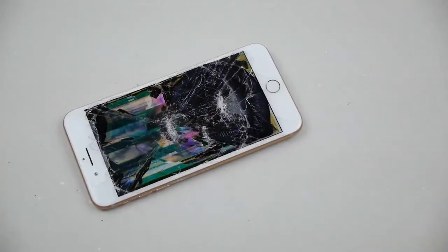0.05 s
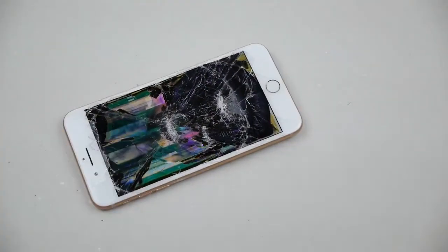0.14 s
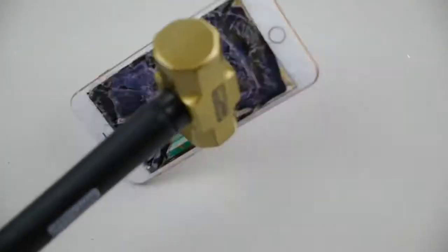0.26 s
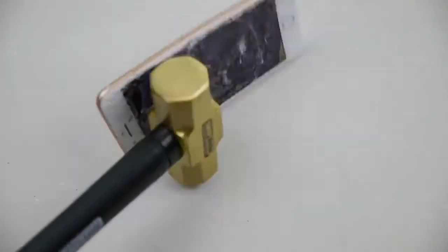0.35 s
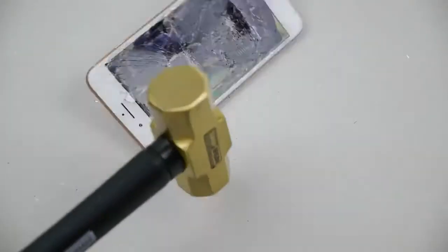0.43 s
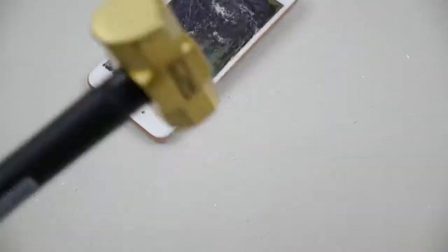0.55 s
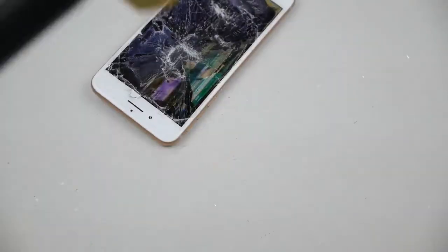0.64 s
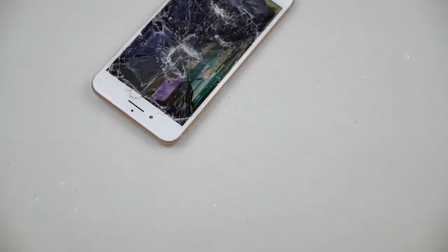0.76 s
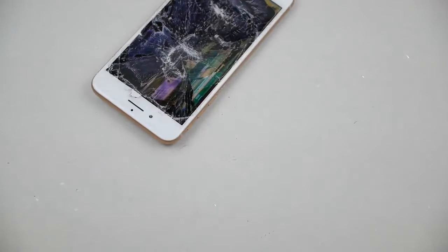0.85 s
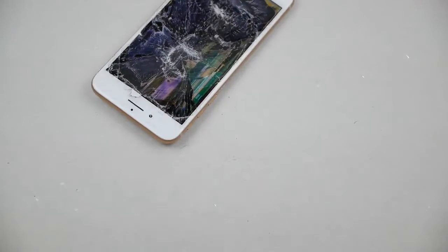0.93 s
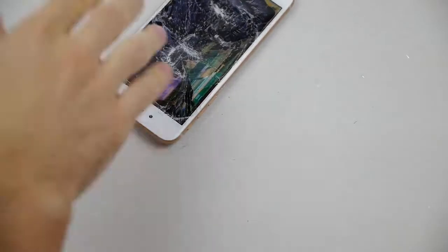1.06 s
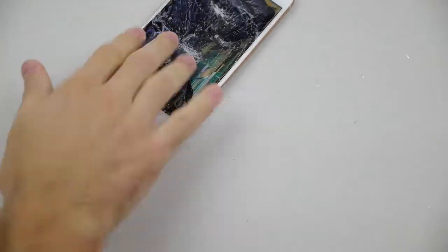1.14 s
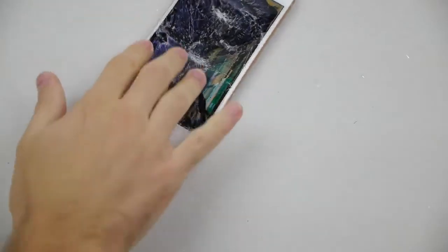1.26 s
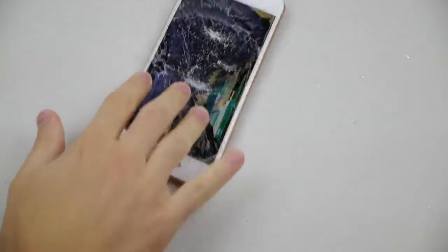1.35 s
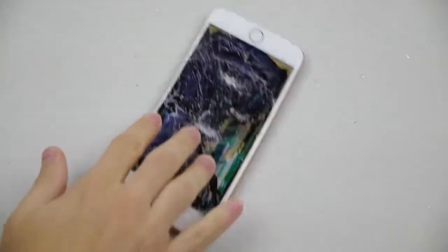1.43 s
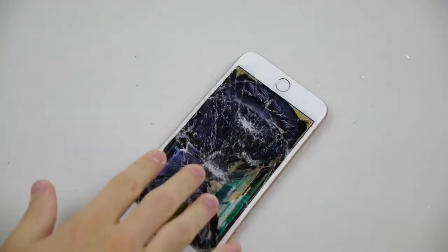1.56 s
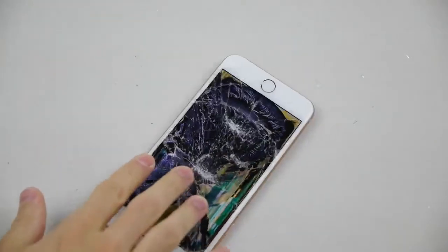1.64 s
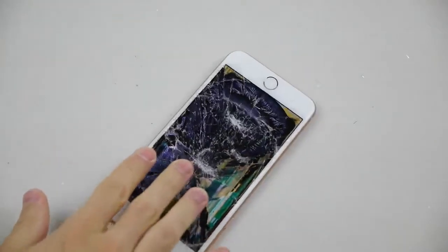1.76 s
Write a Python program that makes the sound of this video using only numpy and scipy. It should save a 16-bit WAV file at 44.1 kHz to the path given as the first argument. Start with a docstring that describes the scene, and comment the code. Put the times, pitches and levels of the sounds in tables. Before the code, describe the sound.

One hard hammer blow on a broken phone screen, a clattering bounce, then gritty glass scraping

```python
"""Quiet room noise, then a hammer hits a cracked phone on a table; it hops, clatters and settles as the room rings.
A hand lands on it and drags it back over glass splinters, which crunch and hiss under the case.
Strikes are clicks plus decaying grit; the drag is shaped grit; table top and shards are decaying sines.
The blow overloads the microphone and pushes down its gain control, whose recovery holds up the echo."""
import sys
import numpy as np
from scipy import signal
from scipy.io import wavfile
from scipy.ndimage import uniform_filter1d

SR = 44100
rng = np.random.default_rng(int(sys.argv[2]) if len(sys.argv) > 2 else 0)


def inscribe(sig):
    """Save sig as 16-bit PCM at rate SR to the path in sys.argv[1].

    A 1-D sig is mono; a 2-D sig holds one channel per row.
    Samples are clipped to [-1, 1] before scaling.
    """
    pcm = np.round(np.clip(np.atleast_2d(sig).T, -1, 1) * 32767)
    wavfile.write(sys.argv[1], SR, pcm.astype(np.int16))


N = 79380
TIME_S = np.arange(N) / SR
RESPONSE_SAMPLES = 8000
EDGES_HZ = 35 * 2 ** np.arange(0, 9.1, .5)  # half octaves
BANDS_HZ = np.sqrt(EDGES_HZ[1:] * EDGES_HZ[:-1])

# background noise: (frequency [Hz], level per band [dB])
FLOOR = [(30, -69), (50, -65), (78, -56.5), (125, -69.5), (250, -69.5), (520, -68), (1000, -69.5),
         (3000, -70.5), (8000, -68.5), (15000, -71.5)]
# stereo likeness: (frequency [Hz], left-right correlation [0..1])
LIKENESS = [(60, 1), (250, .99), (600, 0.94), (1300, 0.77), (2600, 0.32), (5000, 0.51), (14000, 0.06)]
# room decay: (frequency [Hz], t60 [s])
ROOM_T60 = [(60, 0.37), (150, .56), (500, 0.47), (2000, 0.49), (5000, 0.54), (9000, 0.22), (15000, .42)]
# sound sent into the room: (frequency [Hz], relative level [dB])
ROOM_SEND = [(60, -1.5), (150, -3), (400, -10.5), (1200, -4), (4000, -9.5), (9000, -11.5), (15000, -16.5)]

# centres of a strike's bass, thud, knock and crack: (frequency [Hz])
IMPACT_HZ = [120, 450, 2000, 9000]
# the blow, the phone's bounces, single shards snapping under the case:
# (time [s], crumble time constant [s], bass [dB], thud [dB], knock [dB], crack [dB])
IMPACTS = [(0.2488, .002, 9.5, 15.5, 11.5, 2.5), (0.2528, 0.0014, 16.5, 21, 13, 12),
           (0.2559, 0.00067, -8, 21.5, 17, -7), (.2615, 0.0058, -33, 8, 8.5, 4),
           (0.3989, 0.0013, 1, 4, 5.5, -4), (.5160, 0.0028, -22, -30, -14, -15.5),
           (0.5224, 0.011, -12, -15.5, -7.5, -28), (.5810, 0.0029, -42, -17, -22, -47),
           (0.6194, 0.0036, -15.5, -19.5, -21.5, -26.5), (0.6297, 0.00067, -20, -8, -15, -24),
           (0.6586, 0.0067, -30, -22, -17, -45), (0.6838, 0.0036, -20.5, -40, -58, -34.5),
           (0.7068, .004, -32, -39, -52, -32), (0.7373, 0.0019, -43, -44, -40, -38.5),
           (0.747, 0.0063, -30.5, -62, -36, -35), (0.7619, 0.0091, -52, -63, -39, -34.5),
           (.8070, 0.013, -32, -42, -37.5, -37.5), (.8880, 0.0041, -41.5, -53, -61.5, -49.5),
           (1.069, 0.0037, -63, -85, -53, -57), (1.2105, 0.00052, -55.5, -50.5, -34.5, -25.5),
           (1.2767, 0.00043, -72, -50.5, -25, -27), (1.5088, 0.00038, -56, -43, -27, -17)]
# strike spectrum: (frequency [Hz], relative level [dB])
IMPACT_COLOUR = [(35, -32), (70, -20.5), (115, -7), (220, -9), (330, -4.5), (500, 1), (800, -8.5),
                 (1500, -9), (3500, -5.5), (8000, -5), (15000, -10.5)]
# strike ring: (frequency [Hz], t60 [s])
IMPACT_RING = [(60, 0.028), (130, .07), (450, 0.11), (1500, 0.0073), (5000, 0.06), (15000, .016)]
# part of a strike that crumbles glass: (frequency [Hz], share of energy [0..1])
CRUMBLING = [(300, 0.015), (1000, 0.38), (2500, 0.68), (8000, 1)]
# table-top resonances: (frequency [Hz], relative level [dB], t60 [s])
TABLE_MODES = [(116.5, 6.5, 0.22), (147.4, -6.5, 0.37), (167, -10, 0.27), (204.4, -15.5, 0.4),
               (274.7, -12.5, 0.42), (357.6, -4.5, 0.2), (393, -18.5, 0.61), (523, -18.5, 0.38),
               (567, -18.5, 0.33), (928, -25, 0.64)]

# sliding, as the phone skids to rest and is dragged: (time [s], level [dB], treble tilt [dB/octave])
DRAG = [(.90, -71, 4), (.935, -55.5, 3.5), (.96, -67, 2.5), (1.0, -92, 1), (1.185, -85, -4),
        (1.204, -43.5, 2), (1.255, -51, 2), (1.29, -41, 4), (1.325, -40, 6), (1.39, -36, 0.5),
        (1.425, -39.5, 1), (1.521, -32.5, 1.5), (1.555, -41.5, 3), (1.606, -55, 7), (1.671, -41.5, 2),
        (1.721, -48.5, 7), (1.744, -62.5, 5.5), (1.765, -47.5, 4.5), (1.8, -54, 11.5)]
# sliding spectrum: (frequency [Hz], relative level [dB])
DRAG_COLOUR = [(40, -47.5), (75, -30), (120, -1), (200, -15.5), (290, -8), (400, -2.5), (1000, -13.5),
               (1800, -13.5), (3000, 0.5), (6000, -3.5), (11000, -2), (15000, -4)]
TILT_PIVOT_HZ, TILT_LOWEST_HZ = 4270, 900
# centres of a crunch's body, crunch and hiss: (frequency [Hz])
CRUNCH_HZ = [540, 3630, 11100]
# splinters giving way under the case: (time [s], length [s], body [dB], crunch [dB], hiss [dB])
CRUNCHES = [(1.211, 0.0018, -62, -30, -35), (1.2611, 0.0035, -53, -32.5, -32),
            (1.269, 0.006, -34, -23.5, -23.5), (1.276, 0.0081, -45, -30.5, -29),
            (1.338, 0.01, -32.5, -29, -34), (1.362, 0.0066, -33, -17.5, -18.5),
            (1.399, .008, -44, -29.5, -19.5), (1.439, 0.0025, -47, -36, -26),
            (1.452, 0.0029, -36, -23, -15.5), (1.464, 0.0011, -22.5, -70, -56),
            (1.482, 0.012, -41.5, -31, -31), (1.499, 0.01, -53, -28.5, -26.5),
            (1.508, 0.011, -42.5, -33, -44), (1.578, 0.0074, -36, -42, -34.5),
            (1.62, 0.0064, -51.5, -48.5, -30.5), (1.634, 0.0034, -48, -58, -24),
            (1.658, 0.0044, -48.5, -45, -26.5), (1.695, .012, -49.5, -45, -34.5),
            (1.778, 0.045, -66, -40.5, -44.5)]
# crunch spectrum: (frequency [Hz], relative level [dB])
CRUNCH_COLOUR = [(40, -32), (120, -5), (190, -28), (290, -12), (430, -4), (1000, -10.5), (1700, -10.5),
                 (2600, -4), (4500, 2), (7000, 2), (11000, -4.5), (15000, -4.5)]
CRUNCH_ATTACK_S, CRUNCH_RELEASE_S = 0.00087, 0.005
# ring of each grain under the case: (frequency [Hz], t60 [s])
GRIT_RING = [(60, 0.046), (130, 0.099), (500, 0.018), (2500, 0.01), (7000, 0.00563), (15000, 0.0044)]
GRIT_PER_S, GRIT_SPREAD_DB = 5800, 1
GRAIN_COLOUR_DB = 2  # spread of a grain's strength from band to band

# table drone under the sliding case: (time [s], level [dB])
DRONE = [(1.18, -66), (1.21, -40), (1.32, -43.5), (1.36, -27), (1.43, -39.5), (1.49, -41), (1.56, -63),
         (1.63, -61), (1.72, -35.5), (1.8, -60)]
DRONE_HZ, DRONE_T60_S = 121.8, 0.27
# ringing shards: (time [s], frequency [Hz], level [dB], t60 [s])
SHARDS = [(1.211, 6490, -36, 0.13), (1.364, 2377, -16, 0.067), (1.454, 3470, -10, 0.02)]

MIC_LOW_CUT_HZ, CUTOFF_HZ = 140, 15750
GAIN_THRESHOLD_DB, GAIN_DEPTH_DB = -5.5, 30  # depth: most it can duck
GAIN_DETECTOR_S, GAIN_ATTACK_S, GAIN_RECOVERY_DB_PER_S = 0.0013, 0.00067, 70
CLIP_CEILING = .95


def from_db(db):
    """Decibels to gain."""
    return 10 ** (np.asarray(db) / 20)


def unit_energy(x):
    """Scale to a mean energy of one per channel."""
    return x / np.sqrt(np.mean(np.sum(x ** 2, axis=-1)) + 1e-20)


def at_hz(points, hz):
    """Read (frequency [Hz], value) points on a log-frequency axis."""
    f, value = np.transpose(list(points))
    return np.interp(np.log(hz), np.log(f), value)


def clicks(times_s, heights):
    """Train of single-sample clicks."""
    return np.bincount((np.asarray(times_s) * SR).astype(int), heights, N)[:N]


def band(x, k):
    """Pass half-octave band k."""
    sos = signal.butter(2, EDGES_HZ[k:k + 2], "band", fs=SR, output="sos")
    return signal.sosfilt(sos, x + 1e-18)


def spread(mid, side, hz):
    """Turn two unrelated signals into a stereo pair with the correlation set for this pitch."""
    alike = np.clip(at_hz(LIKENESS, hz), 0, 1)
    return np.sqrt((1 + alike) / 2) * mid + np.sqrt((1 - alike) / 2) * np.array([side, -side])


def stereo_noise(hz, size=N):
    """White noise in both channels, correlated as set for this pitch."""
    return spread(*rng.standard_normal((2, size)), hz)


def room_tone():
    """Background noise: steady, each band at its own level."""
    out = 0
    for k, hz in enumerate(BANDS_HZ):
        out = out + from_db(at_hz(FLOOR, hz)) * unit_energy(band(stereo_noise(hz), k))
    return np.sqrt(N) * out  # unit energy to unit RMS


def dying(t60_s):
    """Exponential decay, 60 dB per t60."""
    return np.exp(-np.log(1000) * np.minimum(TIME_S[:RESPONSE_SAMPLES] / t60_s, 4))


def ring(x, hz, t60_s):
    """Damped resonator: a unit click starts a decaying sine of initial height one."""
    r, w = np.exp(-np.log(1000) / (t60_s * SR)), 2 * np.pi * hz / SR
    return signal.lfilter([0, np.sin(w)], [1, -2 * r * np.cos(w), r * r], x + 1e-18)


def resound(drive, k, ring_t60, snap_db, room_db):
    """One band of a contact: sharp snap, short ring, then a diffuse tail as the room gives back energy."""
    hz = BANDS_HZ[k]
    # alternating polarity lets neighbouring bands add at their shared edge
    click = unit_energy(band(signal.unit_impulse(RESPONSE_SAMPLES), k)) * (-1) ** k
    snap = from_db(snap_db) * click
    decaying_noise = stereo_noise(hz, size=RESPONSE_SAMPLES) * dying(at_hz(ring_t60, hz))
    body = unit_energy(band(decaying_noise, k))
    direct = signal.oaconvolve(drive, unit_energy(snap + body), axes=1)[:, :N]

    # room energy: leaky store of drive power
    keep = np.exp(-2 * np.log(1000) / (at_hz(ROOM_T60, hz) * SR))
    stored = signal.lfilter([1 - keep], [1, -keep], np.mean(drive ** 2, axis=0) + 1e-18)
    tail = unit_energy(band(stereo_noise(hz), k)) * np.sqrt(N * stored)
    return direct + from_db(room_db + at_hz(ROOM_SEND, hz)) * tail


def grit():
    """Tiny fractures: random clicks of uneven size, levelled to an even mean power."""
    sizes = from_db(GRIT_SPREAD_DB * np.minimum(rng.exponential(1, N), 5)) * rng.choice([-1, 1], N)
    grains = sizes * (rng.random(N) < GRIT_PER_S / SR)
    local_power = np.abs(uniform_filter1d(grains ** 2, size=200))
    return grains / np.sqrt(local_power + 0.0013)


def strike_strengths(hz):
    """Gain of every strike at one frequency."""
    return from_db([at_hz(zip(IMPACT_HZ, row[2:]), hz) for row in IMPACTS])


def table_top(times_s):
    """Table resonances: each strike sets all modes ringing."""
    out = 0
    for hz, db, t60_s in TABLE_MODES:
        out = out + from_db(db) * ring(clicks(times_s, strike_strengths(hz)), hz, t60_s)
    return out


def impacts():
    """Strikes: energy splits between a click and a short crumble of glass; the table top rings on."""
    times_s = [row[0] for row in IMPACTS]
    crumbles = []
    for start_s, decay_s, *_ in IMPACTS:
        since_s = TIME_S - start_s
        crumbles.append(unit_energy((since_s >= 0) * np.exp(-np.clip(since_s / decay_s, 0, 20))))
    crumble_power = np.array(crumbles) ** 2
    grains = grit(), grit()
    out = 0
    for k, hz in enumerate(BANDS_HZ):
        share = np.clip(at_hz(CRUMBLING, hz), 0, 1)
        strengths = strike_strengths(hz)
        knock = np.sqrt(1 - share) * clicks(times_s, strengths)
        crumble = np.sqrt(share * (strengths ** 2 @ crumble_power)) * spread(*grains, hz)
        drive = (knock + crumble) * np.sqrt(SR / 100)  # unit strength = unit RMS over 10 ms
        contact = resound(drive, k, IMPACT_RING, snap_db=-1.5, room_db=0.24)
        out = out + from_db(at_hz(IMPACT_COLOUR, hz)) * contact
    return out + table_top(times_s)


def tinted(grains):
    """Vary grain strengths afresh for one band, keeping total power."""
    varied = grains * from_db(GRAIN_COLOUR_DB * np.clip(rng.standard_normal(N), -2, 2))
    return varied * np.std(grains) / np.std(varied)


def crunch_envelopes():
    """Splinters giving way: linear attack, hold, exponential release."""
    envelopes = []
    for start_s, length_s, *_ in CRUNCHES:
        since_s = TIME_S - start_s
        attack = np.clip(since_s / CRUNCH_ATTACK_S, 0, 1)
        release = np.exp(-np.maximum(since_s - length_s, 0) / CRUNCH_RELEASE_S)
        envelopes.append(attack * release)
    return np.array(envelopes)


def dragging():
    """Glass grit under the sliding phone: a scratch of varying level with sudden crunches."""
    s, db, tilt = np.transpose(DRAG)
    level_db = np.interp(TIME_S, s, db, left=-120)
    tilt_db_per_octave = np.interp(TIME_S, s, tilt)
    grains = grit(), grit()
    bursts = crunch_envelopes()
    out = 0
    for k, hz in enumerate(BANDS_HZ):
        octaves = np.log2(max(hz, TILT_LOWEST_HZ) / TILT_PIVOT_HZ)
        slide = from_db(level_db + at_hz(DRAG_COLOUR, hz) + tilt_db_per_octave * octaves)
        crunch_db = [at_hz(zip(CRUNCH_HZ, row[2:]), hz) + at_hz(CRUNCH_COLOUR, hz) for row in CRUNCHES]
        crunch = from_db(crunch_db) @ bursts
        drive = tinted(spread(*grains, hz)) * np.hypot(slide, crunch)
        out = out + resound(drive, k, GRIT_RING, snap_db=2, room_db=2.0)
    return out


def table_drone():
    """Friction sustains a low table resonance: noise through two resonators in series."""
    hum = ring(rng.standard_normal(N), DRONE_HZ, DRONE_T60_S)
    hum = ring(hum, DRONE_HZ, DRONE_T60_S / 2)
    level_db = np.interp(TIME_S, *np.transpose(DRONE), left=-120)
    return unit_energy(hum) * np.sqrt(N) * from_db(level_db)


def shards():
    """Splinters snap: each a click into its own resonator."""
    return sum(ring(clicks([s], [from_db(db)]), hz, t60_s) for s, hz, db, t60_s in SHARDS)


def scene():
    """Blow and bounces, then the drag, in a quiet room."""
    return room_tone() + impacts() + dragging() + table_drone() + shards()


def smooth(x, time_s):
    """One-pole smoothing."""
    keep = np.exp(-1 / (time_s * SR))
    return signal.lfilter([1 - keep], [1, -keep], x)


def gain_reduction_db(x):
    """Gain control: ducks fast above the threshold, recovers at a constant rate in dB."""
    power = smooth(np.mean(x ** 2, axis=0), GAIN_DETECTOR_S)
    over_db = np.maximum(10 * np.log10(power + 1e-12) - GAIN_THRESHOLD_DB, 0)
    # running maximum against a ramp = peak hold with linear fall
    ramp_db = GAIN_RECOVERY_DB_PER_S * TIME_S
    held_db = np.maximum.accumulate(np.minimum(over_db, GAIN_DEPTH_DB) + ramp_db) - ramp_db
    return smooth(held_db, GAIN_ATTACK_S)


def record(dry):
    """Microphone: low cut, gain control, soft overload of peaks, steep top cut."""
    low_cut = signal.butter(2, MIC_LOW_CUT_HZ, "high", fs=SR, output="sos")
    dry = signal.sosfilt(low_cut, dry)
    x = dry * from_db(-gain_reduction_db(dry))
    clipped = CLIP_CEILING * x / (1 + x ** 4) ** .25
    top_cut = signal.ellip(10, .1, 80, CUTOFF_HZ, fs=SR, output="sos")
    return signal.sosfilt(top_cut, clipped)


dry = scene()
out = record(dry)
inscribe(out)
```